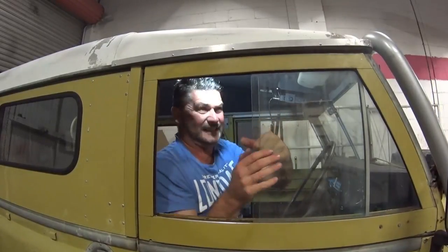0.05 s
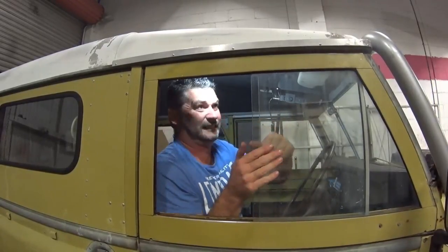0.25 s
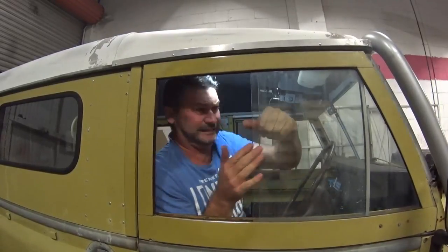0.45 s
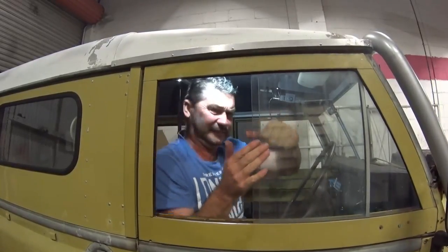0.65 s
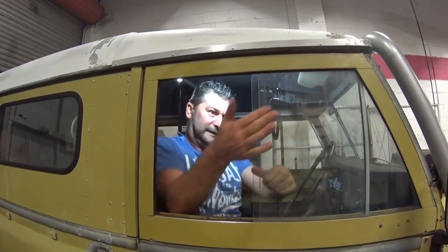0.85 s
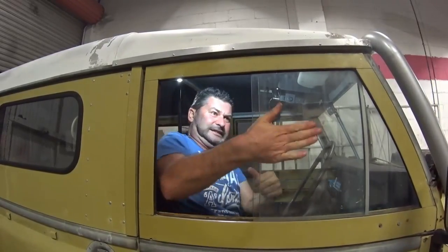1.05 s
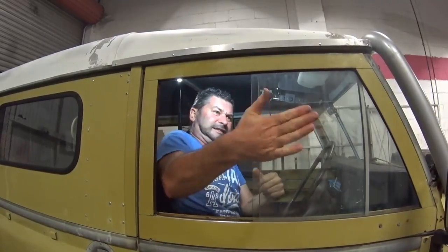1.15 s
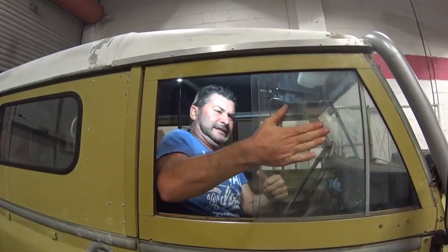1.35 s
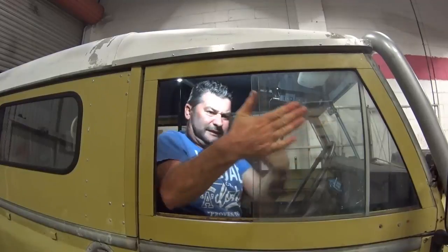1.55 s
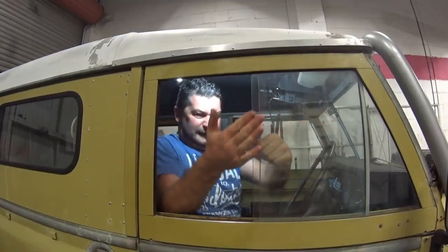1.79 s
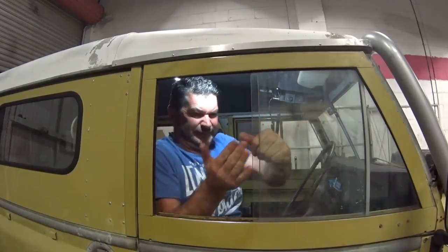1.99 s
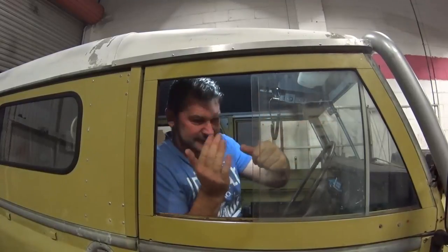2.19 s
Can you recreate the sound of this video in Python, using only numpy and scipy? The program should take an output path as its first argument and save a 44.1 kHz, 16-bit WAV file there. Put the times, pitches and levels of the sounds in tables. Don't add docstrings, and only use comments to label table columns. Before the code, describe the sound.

A fist pounds a loose vehicle window, five booming thumps with short rattles in a garage

```python
import sys
import numpy as np
from scipy import signal
from scipy.fft import rfft, irfft, next_fast_len
from scipy.io import wavfile
from scipy.ndimage import uniform_filter1d, minimum_filter1d, map_coordinates

SR = 44100
rng = np.random.default_rng(int(sys.argv[2]) if len(sys.argv) > 2 else 0)


def to_wav(sig):
    pcm = np.clip(np.atleast_2d(sig), -1, 1) * 32767
    pcm = np.round(pcm).astype(np.int16)
    wavfile.write(sys.argv[1], SR, pcm.T)


def ratio_of_db(decibels):
    return 10 ** (np.asarray(decibels, float) / 20)


N = 98078
LEAD_IN = SR // 4

# start in seconds, strength in dB, brightness in dB per octave,
# slap rise in seconds, garage answer in dB.
BLOWS = [
    (-.060, -14, -0.5, 0.00117, 1.5),
    (0.4506, -11.5, 0.5, 0.00465, 3),
    (1.0178, -13.5, -2, 0.00034, -1.5),
    (1.2734, -14.5, 0, 0.001063, 4),
    (1.681, -15.5, -2, 0.00169, 0),
    (1.998, -9, 1, 0.01265, 4),
]
# boom in dB, favoured pitch in Hz, boom rise in seconds,
# then two modes struck at their belly, in Hz.
FIST_SPOTS = [
    (-7.5, 451, 0.0063, 289, 495),
    (-9.5, 354, 0.0184, 289, 247),
    (-3.5, 387, 0.0187, 289, 372),
    (-7, 325, 0.0142, 421, 289),
    (-5.5, 305, 0.0256, 495, 289),
    (-7, 577, 0.0223, 338, 289),
]
# start in seconds, boom in dB, mode struck in Hz.
BOUNCES = [
    (1.290, -24.5, 421),
    (1.697, -22, 495),
    (1.7725, -35, 289),
    (1.8052, -49.5, 421),
    (2.0715, -27.5, 338),
]
# start in seconds, peak in dB, centre in Hz,
# time to fall 60 dB in seconds.
RATTLES = [(0.4542, -23, 7000, 0.0049), (0.4574, -8.5, 6480, 0.0058), (0.4622, -9.5, 3000, 0.0054),
           (0.4729, -10, 2000, 0.0065), (1.0178, -14, 5000, 0.015), (1.0297, -1.5, 7660, 0.0025),
           (1.047, -17.5, 8500, .004), (1.055, -17, 4960, 0.009), (1.2814, -5.5, 8600, 0.0035),
           (1.309, -24.5, 8000, 0.0287), (1.686, -18, 5460, 0.0171), (1.6915, -16.5, 5510, 0.0077),
           (1.7059, -18, 5500, 0.0158), (1.7401, -4.5, 2410, 0.0057), (1.7422, -18, 4500, 0.0091),
           (1.7724, -14, 3810, 0.006), (1.7755, -14.5, 2450, 0.0111), (1.8018, -23, 3010, 0.005),
           (1.8047, -12, 2510, 0.0058), (2.0065, -12, 4500, 0.0145), (2.0085, -15.5, 7530, 0.0101),
           (2.021, -20.5, 7000, 0.013), (2.070, -14.5, 2980, 0.017), (2.098, -28, 6900, 0.0095),
           (2.133, -17.5, 2540, .01)]
# pitch in Hz, level in dB per Hz.
SLAP_COLOUR = [(35, -61), (60, -17), (367, -1.5), (1580, 2.5), (3170, -3), (3620, -6), (6110, -17.5),
               (8650, -21), (11000, -34), (14300, -59.5), (22000, -120)]
# pitch in Hz, time to fall 60 dB in seconds.
SLAP_T60 = [(100, 0.75), (400, 0.2454), (1500, 0.0883), (5000, 0.07), (10000, 0.0425)]
# pitch in Hz, level in dB, time to fall 60 dB in seconds.
DOOR_MODES = [(117.63, -7.5, 0.43), (178.2, -8, 0.43), (247.65, 2, 0.192), (289, -1, 0.2024),
              (338, -2.5, 0.272), (369.3, -9, 0.63), (421, -0.5, 0.155), (495, -2, 0.1963),
              (545.2, -9.5, 0.238), (608.6, -0.5, 0.1915), (656.3, -2, 0.55), (721.3, -2, 0.186),
              (828, 0.5, 0.1695), (1091.6, -3.5, 0.45)]
# pitch in Hz, level in dB, time to fall 60 dB in seconds.
EDGE_MODES = [(1963, -5, .015), (2880, -8.5, .015), (3970, 5.5, 0.0105), (4885, -11.5, 0.06),
              (6547, 0.5, 0.0127), (8500, 2.5, 0.0099)]
# start in seconds, pitch in
# Hz, level in dB, time to fall 60 dB in seconds, # width in Hz.
TRIM_CLIP = (2.5, 4896.5, -21, 4.5, 60)
# pitch in Hz, time to fall 60 dB in seconds.
GARAGE_T60 = [(80, 1.052), (260, 0.73), (700, 0.9495), (1800, 1.027), (4800, 1.042), (10000, 0.619)]
# pitch in Hz, level in dB.
GARAGE_COLOUR = [(60, 6.5), (300, 3.5), (1500, -3.65), (5000, -1.5), (11000, -2.5)]
# pitch in Hz, level in dB per Hz.
HUSH_COLOUR = [(18, -65.5), (30, -30.5), (91, -17), (182, -10), (257, -1), (501, -1.5), (2150, -10.5),
               (11000, -41.5), (14300, -71), (22000, -120)]
# pitch in Hz, likeness from 0 to 1.
ALIKE = [(60, 0.899), (250, 1), (1000, 0.987), (4000, 0.883), (10000, 0.88)]
# pitch in Hz, left over right in dB.
LEFT_OVER_RIGHT = [(60, -2), (110, -2), (190, -3.0), (350, -3.5), (620, -5.0), (1120, -5.0), (2010, -5),
                   (3620, -2), (6490, -1.0), (11700, 0)]
# pitch in Hz, radians by which left leads.
LEFT_LEADS = [(0, 0.88), (520, -0.569), (1550, -0.547), (3880, 0.504), (11800, 0.17)]
# pitch in Hz, level in dB.
CAMERA_BAND = [(20, -7.5), (60, 4), (10300, 2), (11000, -1), (11250, -21), (12300, -36), (12400, -120)]


def blows():
    out, t = np.zeros((2, N + LEAD_IN)), np.arange(SR // 2) / SR
    for blow, spot in zip(BLOWS, FIST_SPOTS):
        s, db, tilt_db, rise, wet_db = blow
        boom_db, favoured_hz, swell, *bellies = spot
        colour = lambda hz: along(SLAP_COLOUR, hz) + tilt_db * np.log2(hz / 1000 + 0.019)
        noise = dying(SLAP_T60, colour, size=128, count=len(t), channels=1)[0]
        slap = 20 * noise * (1 - np.exp(-(t / rise) ** 2))
        add(out, s, garage(ratio_of_db(db) * slap, colour, wet_db, rise))
        add(out, s, boom(db + boom_db, favoured_hz, swell, bellies, wet_db))
    for s, db, struck_hz in BOUNCES:
        add(out, s, boom(db, struck_hz, 0.00154, [struck_hz], 0))
    return out


def boom(db, favoured_hz, swell, bellies, wet_db):
    t = np.arange(SR // 2) / SR
    loss_db, belly_db, belly_octaves = 3.5, 7, 0.05
    favour = lambda hz: -loss_db * np.abs(np.log2(hz / favoured_hz + 1e-3))

    def struck(hz):
        nearness = max(np.exp(-(np.log2(hz / b) / belly_octaves) ** 2) for b in bellies)
        return favour(hz) + belly_db * nearness

    skin = ratio_of_db(db) * ring(DOOR_MODES, t, struck, scatter_db=0.5) * (1 - np.exp(-t / swell))
    outline = [(50, -29.5)] + [mode[:2] for mode in DOOR_MODES] + [(2000, -22)]
    spread = lambda hz: along(outline, hz) + favour(hz)
    tail = dying(GARAGE_T60, spread, size=512, count=SR)
    kept = signal.fftconvolve(skin[None], tail, axes=1)[:, :SR]
    kept = kept * np.linalg.norm(skin) / np.linalg.norm(kept[0])
    return garage(skin, spread, wet_db - 2, swell) + ratio_of_db(wet_db - 6.5) * kept


def rattles():
    out, t = np.zeros((2, N + LEAD_IN)), np.arange(SR // 16) / SR
    width_octaves, top_steeper = 0.806, 1.226
    for s, db, centre_hz, t60 in RATTLES:
        def colour(hz):
            octaves = np.log2(hz / centre_hz + 1e-3) / width_octaves
            return -6 * (octaves * np.where(hz > centre_hz, top_steeper, 1)) ** 2

        tick = filtered(rng.standard_normal(len(t)), lambda hz: ratio_of_db(colour(hz)))
        tick = tick / tick.std() / 2 * ratio_of_db(-60 * t / t60)
        edge = ratio_of_db(-16) * ring(EDGE_MODES, t, colour, scatter_db=2)
        onset = 1 - np.exp(-t * SR / 8)
        add(out, s, garage(ratio_of_db(db) * (tick + edge) * onset, colour, wet_db=-9))
    return out


def trim():
    out, t = np.zeros((2, N + LEAD_IN)), np.arange(SR // 2) / SR
    s, centre_hz, db, t60, width = TRIM_CLIP
    buzz = filtered(rng.standard_normal((2, len(t))), lambda hz: 1 / (1 + ((hz - centre_hz) / width) ** 2))
    add(out, s, ratio_of_db(db - 60 * t / t60) * buzz / buzz.std())
    return out


def garage(x, colour, wet_db, rise=0):
    t = np.arange(SR) / SR
    lump_db, lumps_per_s, lump_fade_s, first_wall_s = 3, 150, 0.156, 0.002
    tail = dying(GARAGE_T60, lambda hz: along(GARAGE_COLOUR, hz) + colour(hz), size=512, count=SR)
    lumps = map_coordinates(rng.standard_normal(400), [t * lumps_per_s])
    tail = tail * ratio_of_db(lump_db * lumps * np.exp(-t / lump_fade_s))
    build_up = 1 - np.exp(-t / (first_wall_s + rise))
    wet = ratio_of_db(wet_db) * np.linalg.norm(x) * tail * build_up
    wet[0, :len(x)] += x
    wet[1, :len(x)] += np.roll(x, 40)
    return wet


def air():
    hush = filtered(rng.standard_normal((2, N + LEAD_IN)), lambda hz: ratio_of_db(along(HUSH_COLOUR, hz)))
    return ratio_of_db(-48.5) * hush / hush.std()


def along(points, hz):
    f, v = np.transpose(points)
    return np.interp(np.log(hz + 1), np.log(f + 1), v)


def filtered(x, response):
    n = x.shape[-1]
    m = next_fast_len(n + 8192)
    return irfft(rfft(x, m) * response(np.fft.rfftfreq(m, 1 / SR)), m)[..., :n]


def dying(t60s, colour, size, count, channels=2):
    hz, t, z = signal.stft(rng.standard_normal((channels, count)), SR, nperseg=size)
    t60 = np.maximum(along(t60s, hz), 0.005)[:, None]
    faded = z * ratio_of_db(colour(hz)[:, None] - 60 * t / t60)
    tail = signal.istft(faded, SR, nperseg=size)[1][:, :count]
    return tail / np.linalg.norm(tail, axis=1, keepdims=True)


def ring(modes, t, colour, scatter_db):
    total = np.zeros(len(t))
    for hz, db, t60 in modes:
        luck, phase = rng.standard_normal(2)
        t60 = min(t60, 0.28)
        level = ratio_of_db(db + colour(hz) + scatter_db * luck - 60 * t / t60)
        total += level * np.sin(2 * np.pi * hz * t + 3 * phase)
    return total


def add(track, s, x):
    i = round(s * SR) + LEAD_IN
    part = track[:, i:i + x.shape[-1]]
    part += x[..., :part.shape[-1]]


def scene():
    common, differs = (blows() + rattles() + trim() + air())[:, LEAD_IN:]
    turn = lambda hz: np.arccos(np.clip(along(ALIKE, hz), -1, 1)) / 2
    mid, side = filtered(np.array([common, differs]), lambda hz: [np.cos(turn(hz)), np.sin(turn(hz))])
    half = lambda hz: ratio_of_db(along(LEFT_OVER_RIGHT, hz) / 2) * np.exp(0.5j * along(LEFT_LEADS, hz))
    return filtered(np.array([mid + side, mid - side]), lambda hz: [half(hz), 1 / half(hz)])


def roll_off(x):
    return signal.sosfilt(signal.butter(12, 12260, fs=SR, output="sos"), x)


def record(dry):
    ceiling_db = -5
    look, hold = int(0.007 * SR) + 1, int(0.0114 * SR) + 1
    need = np.minimum(1, ratio_of_db(ceiling_db) / (np.abs(dry).max(axis=0) + 1e-9))
    lowest = minimum_filter1d(need, look + hold, origin=(hold - look) // 2)
    limited = dry * uniform_filter1d(lowest, look)
    rounded = limited / (1 + np.abs(limited) ** 4) ** (1 / 4)
    mix = filtered(rounded, lambda hz: ratio_of_db(along(CAMERA_BAND, hz)))
    return roll_off(mix)


dry = scene()
out = record(dry)
to_wav(out)
```